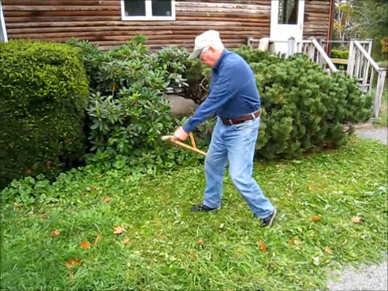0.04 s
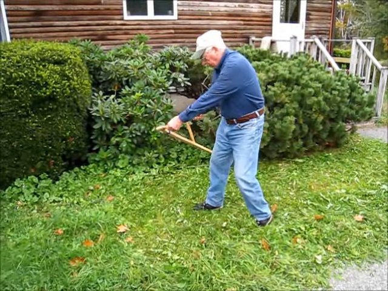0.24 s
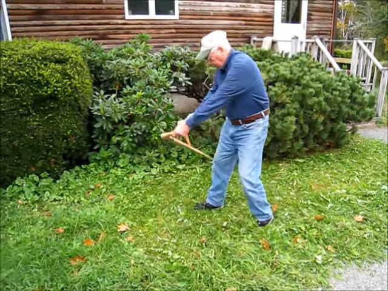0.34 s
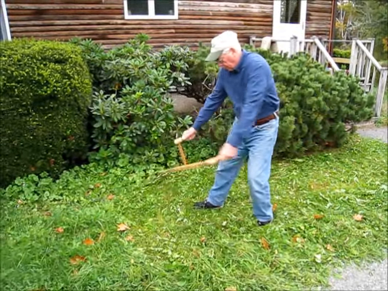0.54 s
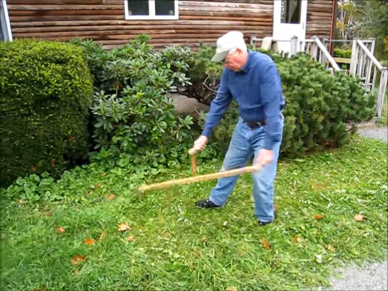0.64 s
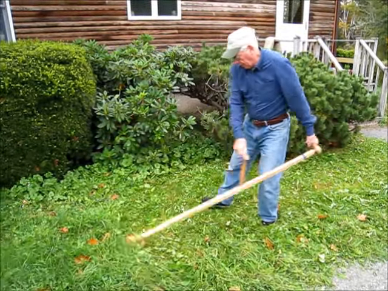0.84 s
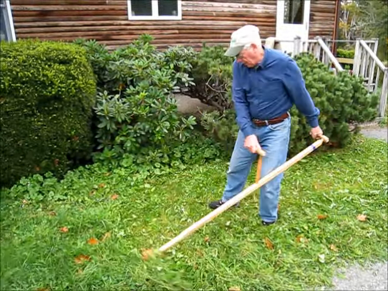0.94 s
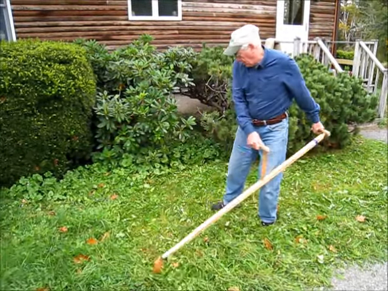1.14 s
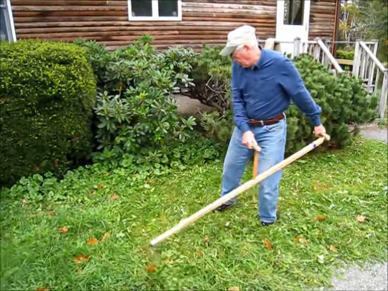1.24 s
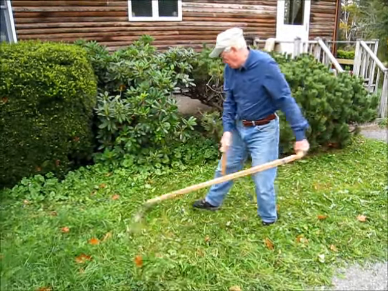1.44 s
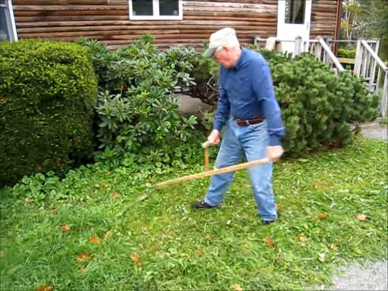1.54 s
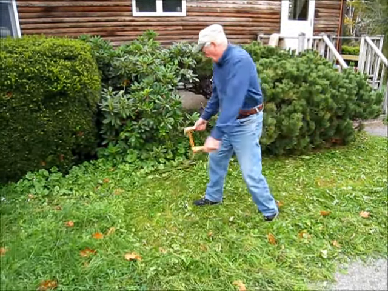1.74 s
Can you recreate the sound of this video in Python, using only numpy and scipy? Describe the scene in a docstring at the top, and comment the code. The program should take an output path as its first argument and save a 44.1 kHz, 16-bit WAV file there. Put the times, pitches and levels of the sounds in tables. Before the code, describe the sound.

A scythe swishes once through grass, with rustling and small clicks, over outdoor hiss.

```python
"""One stroke of a scythe on a lawn, in mono. Loose grass rustles and the wooden handle creaks and clicks.
The blade squeaks into the grass, dry stems snap, the grips tap and feet thud softly. From 0.6 s the edge
shears a dense run of stalks that ring its thin steel, and catches on two tufts. From 1.1 s it slides
back over the stubble, with more snaps and taps. Outdoor hiss and a low electric hum lie under it all."""
import sys
import numpy as np
from scipy import signal
from scipy.fft import rfft, irfft, next_fast_len
from scipy.io import wavfile
from scipy.ndimage import map_coordinates

SR = 44100
rng = np.random.default_rng(int(sys.argv[2]) if len(sys.argv) > 2 else 0)


def output_pcm(signal):
    """Save a mono or channel-first signal as 16-bit PCM at the path in sys.argv[1].

    Samples are clipped to [-1, 1] before scaling.
    """
    pcm = np.clip(np.atleast_2d(signal).T, -1, 1) * 32767
    wavfile.write(sys.argv[1], SR, np.round(pcm).astype(np.int16))


N = 79380  # 1.8 s
STALKS_PER_S = 5000

# Force of the cut. Each row: time in seconds, level in dB.
CUT_LEVEL = [(.58, -73), (.645, -37), (.685, -28.5), (.715, -27), (.75, -21), (.775, -22.5), (.80, -21),
             (.823, -24.5), (.845, -19), (.897, -24), (.92, -23.5), (.98, -35), (1.02, -37), (1.12, -53.5)]
# Tufts catching the blade. Each row: centre in seconds, level in dB, half length in seconds.
TUFT_BITES = [(.657, -17.5, 0.0024), (.6655, -27, 0.0018), (.8085, -13.5, 0.0046)]
# Spectra of shearing and of a bite. Each row: frequency in Hz, relative level in dB.
SHEAR_SPECTRUM = [(60, -41), (250, -18), (480, -28), (750, -5.5), (1900, -7), (2800, -3.5), (4200, -2),
                  (6000, -8), (8500, -19), (15000, -35)]
TUFT_SPECTRUM = [(100, -33), (320, -21), (480, -26), (750, -8.5), (2000, -12), (3300, 4.5), (4200, -1.5),
                 (5500, -14), (9000, -21), (15000, -35)]
def cut():
    """The forward stroke shears stalks along the edge; thick tufts give brief hard bites."""
    stalks = blade(SHEAR_SPECTRUM, spread_db=3)
    scraping = amp(-4) * scrape(crackle(STALKS_PER_S, spread_db=4), width_hz=820)
    swish = level(CUT_LEVEL) * amp(0.94 * wobble(130)) * unit(stalks + scraping)
    bites = swells(TUFT_BITES) * unit(coloured(rng.standard_normal(N), TUFT_SPECTRUM))
    return swish + bites


# Resonances of the steel. Each row: frequency in Hz, width in Hz, gain in dB.
BLADE_MODES = [(890, 210, -8.5), (1405, 30, -1.5), (1793, 88, 3), (2270, 50, -2), (2455, 78, 4.5),
               (3210, 63, 6), (3330, 60, -5), (3785, 44, 4), (4600, 62, -6), (4690, 110, -4),
               (4810, 88, -5), (5790, 130, -7), (6420, 230, -6), (7110, 120, -26)]
# Ring of the steel, freer as it leaves the grass. Each row: time in seconds, dB over the direct sound.
BLADE_RING = [(.7, -3), (.8, -0.5), (.9, 3.5), (1.0, 4), (1.2, -1), (1.32, 1), (1.6, -5.5)]
def blade(spectrum, spread_db):
    """Stalks breaking on the edge, heard directly and through the steel."""
    ring_gain = amp(curve(BLADE_RING))
    direct = unit(coloured(crackle(STALKS_PER_S, spread_db), spectrum))
    steel = unit(ringing(crackle(STALKS_PER_S, spread_db), BLADE_MODES))
    return (direct + ring_gain * steel) / np.sqrt(1 + ring_gain ** 2)


# Path of the scraping band. Each row: time in seconds, centre in Hz.
SCRAPE_CENTRE = [(.65, 3530), (.715, 2720), (.80, 3480), (.85, 4000), (.93, 4180), (1.2, 3880), (1.3, 3400),
                 (1.42, 3300), (1.6, 3100)]
def scrape(friction, width_hz):
    """A resonance that follows the point of contact along the blade, crossfaded over fixed bands."""
    centres_hz = np.geomspace(2200, 4800, 15)
    position = np.interp(curve(SCRAPE_CENTRE), centres_hz, np.arange(len(centres_hz)))
    out = np.zeros(N)
    for band, hz in enumerate(centres_hz):
        weight = np.maximum(1 - np.abs(position - band), 0)
        out += weight * ringing(friction, [(hz, width_hz, 0)])
    return unit(out)


# The blade's back on the ground, and its pressure on the stubble. Each row: time in seconds, level in dB.
SKIM_LEVEL = [(1.13, -54), (1.2, -40.5), (1.25, -51), (1.33, -45), (1.42, -42), (1.51, -41), (1.63, -61)]
STUBBLE_LEVEL = [(1.17, -46), (1.23, -39.5), (1.30, -36), (1.36, -40), (1.44, -45), (1.495, -34.5),
                 (1.56, -43), (1.595, -36.5), (1.66, -46.5), (1.8, -44)]
# Stubble spectrum. Each row: frequency in Hz, relative level in dB.
STUBBLE_SPECTRUM = [(200, -14.5), (500, -13), (900, 2.5), (2000, 0), (3000, 1.5), (5000, 0), (8000, -5.5),
                    (15000, -22)]
def slide():
    """The blade skims back over the stubble with a narrow, falling scrape."""
    skim = level(SKIM_LEVEL) * scrape(rng.standard_normal(N), width_hz=390)
    stubble = level(STUBBLE_LEVEL) * amp(wobble(70)) * blade(STUBBLE_SPECTRUM, spread_db=3.5)
    return skim + stubble


# Stirring of loose grass. Each row: time in seconds, level in dB.
RUSTLE_LEVEL = [(0, -37.5), (.04, -35), (.11, -43), (.19, -44.5), (.23, -66), (.3, -49.5), (.39, -36.5),
                (.49, -33.5), (.62, -31.5), (.86, -33), (.93, -32), (.99, -40), (1.12, -49.5), (1.22, -49),
                (1.32, -39.5), (1.43, -41.5), (1.5, -37), (1.66, -39.5), (1.8, -36.5)]
# Leaf spectrum. Each row: frequency in Hz, relative level in dB.
LEAF_SPECTRUM = [(100, -14.5), (450, -12), (900, -3.5), (1800, -4.5), (3000, 0.5), (5000, 0.5),
                 (8000, -4.5), (11500, -3.5), (15500, -9)]
def rustle():
    """Loose leaves brush one another: fine crackle over a soft hiss."""
    grains = crackle(per_s=3800, spread_db=3) + amp(-3) * rng.standard_normal(N)
    return level(RUSTLE_LEVEL) * amp(1.1 * wobble(59.8)) * unit(coloured(grains, LEAF_SPECTRUM))


# Handle creak. Each row: centre in seconds, level in dB, half length in seconds.
HANDLE_CREAKS = [(.2115, -35, 0.0041)]
# Handle click. Each row: start in seconds, peak in dB before the ring is added.
HANDLE_CLICKS = [(.2413, -7)]
# Click spectrum. Each row: frequency in Hz, relative level in dB.
CLICK_SPECTRUM = [(100, -27), (480, -26), (780, -6), (2200, -6), (3500, -6), (4100, -16.5), (4700, -21),
                  (5400, -15), (6000, -27), (7300, -28), (7900, -20.5), (11500, -28.5), (15000, -22.5)]
# Resonances of the wood. Each row: frequency in Hz, width in Hz, gain in dB.
CREAK_MODES = [(734, 46, 5), (2870, 130, -0.5)]
CLICK_MODES = [(3480, 520, 0.5)]
def handle():
    """The wooden handle creaks under load, then clicks with a short ring."""
    creak = swells(HANDLE_CREAKS) * unit(ringing(rng.standard_normal(N), CREAK_MODES))
    click = ticks(HANDLE_CLICKS, CLICK_SPECTRUM)
    return creak + click + amp(4.5) * ringing(click, CLICK_MODES)


# Breaking stems. Each row: start in seconds, peak in dB.
STEM_SNAPS = [(.3863, -13), (.3918, -16), (.3965, -11), (1.4985, -23), (1.518, -24), (1.592, -15.5)]
# Snap spectrum. Each row: frequency in Hz, relative level in dB.
SNAP_SPECTRUM = [(200, -22), (1200, -7), (2100, -4), (2700, 11), (3500, -1), (4700, 0), (7000, -17),
                 (15000, -8.5)]
def stems():
    """Dry stems snap, each in one bright tick."""
    return ticks(STEM_SNAPS, SNAP_SPECTRUM)


# Taps of the grips. Each row: start in seconds, peak in dB.
GRIP_TAPS = [(.3222, -29), (.4598, -28), (1.5965, -27), (1.6925, -25.5), (1.7805, -27)]
# Tap spectrum. Each row: frequency in Hz, relative level in dB.
TAP_SPECTRUM = [(150, -10), (500, -12), (900, 10.5), (1800, 14.5), (2800, -20), (5000, -22), (15000, -13)]
def grips():
    """The grips give short dull taps."""
    return ticks(GRIP_TAPS, TAP_SPECTRUM)


# Squeaks on entering the grass. Each row: centre in seconds, level in dB, half length in seconds.
ENTRY_SQUEAKS = [(.344, -41.5, 0.017), (.3598, -31, 0.00092), (.3697, -25, 0.00094)]
# Squeak resonance, applied twice. Each row: frequency in Hz, width in Hz, gain in dB.
SQUEAK_MODES = [(4720, 580, 0)]
def squeaks():
    """Steel rubs on wet stalks in a narrow high band."""
    rubbing = ringing(rng.standard_normal(N), SQUEAK_MODES)
    return swells(ENTRY_SQUEAKS) * unit(ringing(rubbing, SQUEAK_MODES))


# Feet on turf. Each row: start in seconds, gain in dB, frequency in Hz, 60 dB decay time in seconds.
FOOT_THUDS = [(.470, -14.5, 152, 0.023), (0.717, -30, 85, 0.067), (.778, -38, 52, 0.13),
              (0.853, -43, 135, 0.067), (0.904, -36, 124, .06)]
def feet():
    """Weight shifts on soft ground: a few low damped cycles."""
    out = np.zeros(N)
    for start_s, db, hz, t60_s in FOOT_THUDS:
        age_s = np.maximum(seconds() - start_s, 0)
        attack = 1 - np.exp(-age_s / 0.0075)
        out += amp(db - 60 * age_s / t60_s) * attack * np.sin(2 * np.pi * hz * age_s)
    return out


def yard(x, scatter_db=-15, t60_s=0.09):
    """Adds a faint short scatter from ground, hedge and wall."""
    tail = rng.standard_normal(N) * amp(-60 * seconds() / t60_s)
    return x + amp(scatter_db) * signal.fftconvolve(x, tail / np.linalg.norm(tail))[:N]


# Spectrum of the outdoor hiss. Each row: frequency in Hz, relative level in dB.
AIR_SPECTRUM = [(25, -13), (70, -5), (160, -2), (400, -0.5), (850, 1), (1800, -6), (4000, -11), (8000, -9),
                (15500, -18)]
def background(hiss_db=-48, hum_db=-56.5, hum_hz=119.8):
    """Steady outdoor hiss and a slightly unsteady mains hum."""
    hum = amp(hum_db + 0.33 * wobble(3.3)) * unit(np.sin(2 * np.pi * hum_hz * seconds()))
    hiss = amp(hiss_db) * unit(coloured(rng.standard_normal(N), AIR_SPECTRUM))
    return hum + hiss


def amp(db):
    """Decibels to gain."""
    return 10 ** (np.asarray(db) / 20)


def unit(x):
    """Scale to rms 1."""
    return x / np.sqrt(np.mean(x ** 2) + 1e-20)


def seconds():
    """The time of each sample."""
    return np.arange(N) / SR


def curve(rows):
    """One value per sample from (s, value) points."""
    return np.interp(seconds(), *np.transpose(rows))


def level(rows):
    """Gain per sample from (s, dB) points, fading 200 dB a second outside them."""
    t = seconds()
    outside_s = np.maximum(rows[0][0] - t, 0) + np.maximum(t - rows[-1][0], 0)
    return amp(curve(rows) - 200 * outside_s)


def swells(rows):
    """Gain per sample of brief bell-shaped swells."""
    return sum(amp(db) * np.exp(-.5 * ((seconds() - s) / half_s) ** 2) for s, db, half_s in rows)


def wobble(knots_per_s):
    """A smooth random curve, rms near 1."""
    return map_coordinates(rng.standard_normal(2000), [seconds() * knots_per_s], mode="mirror")


def coloured(x, spectrum):
    """Minimum-phase filter through (Hz, dB) points."""
    size = 8192
    hz, db = np.transpose(spectrum)
    bins_hz = np.fft.rfftfreq(size, 1 / SR)
    gain = amp(np.interp(np.log(bins_hz + 1), np.log(hz), db))
    cepstrum = irfft(np.log(gain))
    cepstrum[1:size // 2] *= 2
    cepstrum[size // 2 + 1:] = 0
    response = irfft(np.exp(rfft(cepstrum)))
    return signal.fftconvolve(x, response)[:N]


def ringing(x, modes):
    """x through parallel resonances."""
    return sum(amp(db) * signal.lfilter(*signal.iirpeak(hz, hz / width_hz, SR), x)
               for hz, width_hz, db in modes)


def crackle(per_s, spread_db):
    """Tiny impulses at random moments and of random size, rms 1."""
    hits = rng.random(N) < per_s / SR
    signs = np.sign(rng.standard_normal(N))
    sizes = amp(spread_db * np.minimum(rng.standard_normal(N), 2.5))
    return unit(hits * signs * sizes)


def ticks(rows, spectrum):
    """Single sharp contacts that die within milliseconds."""
    shape = coloured(signal.unit_impulse(N), spectrum)
    blows = np.zeros(N)
    for start_s, db in rows:
        blows[int(start_s * SR)] += amp(db)
    return signal.fftconvolve(blows, shape / np.abs(shape).max())[:N]


def scene():
    """The mowing in its yard, the same in both channels."""
    contacts = handle() + stems() + grips()
    mowing = cut() + slide() + rustle() + contacts + squeaks() + feet()
    mono = yard(mowing) + background()
    return np.array([mono, mono])


TOP_HZ = 15950
def record(dry):
    """Brick-wall low-pass at TOP_HZ."""
    size = next_fast_len(N + SR // 10)
    passband = np.fft.rfftfreq(size, 1 / SR) < TOP_HZ
    return irfft(rfft(dry, size) * passband, size)[:, :N]


dry = scene()
out = record(dry)
output_pcm(out)
```